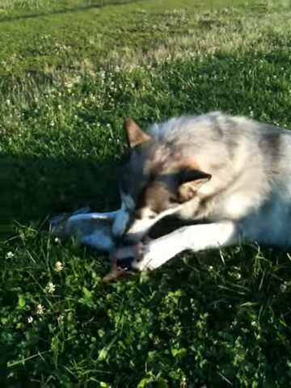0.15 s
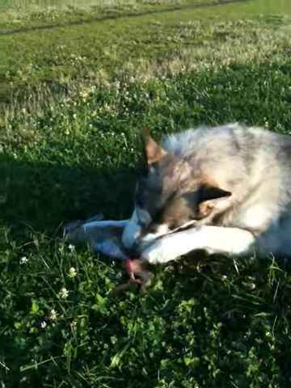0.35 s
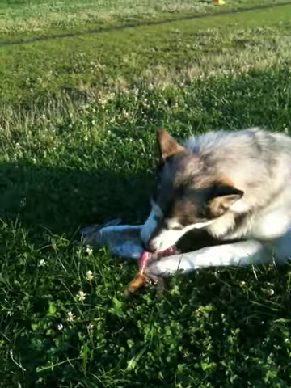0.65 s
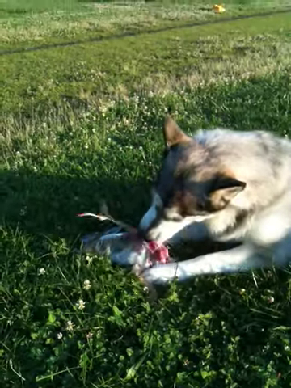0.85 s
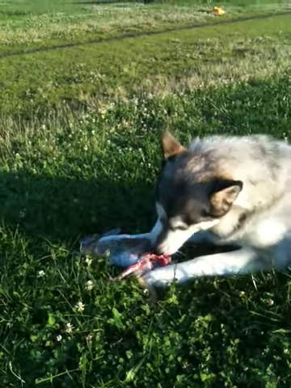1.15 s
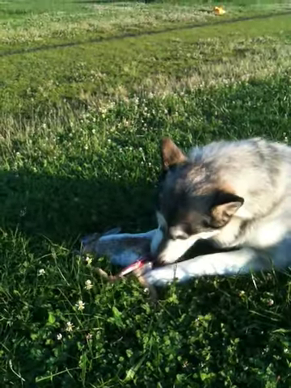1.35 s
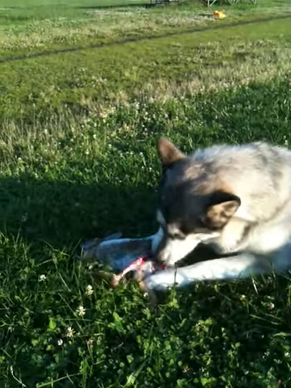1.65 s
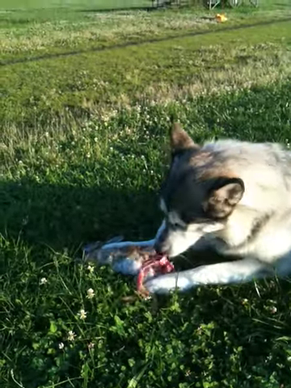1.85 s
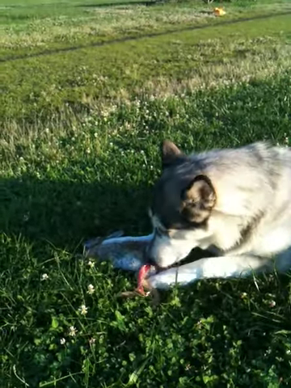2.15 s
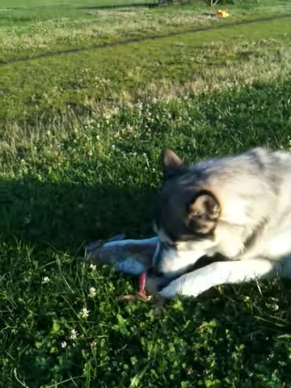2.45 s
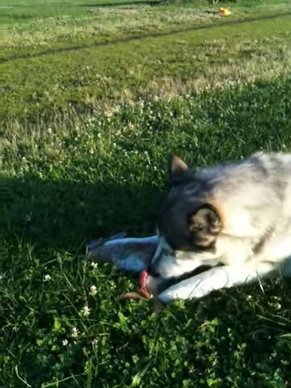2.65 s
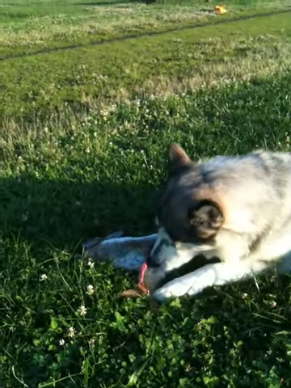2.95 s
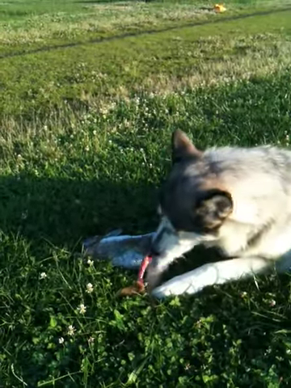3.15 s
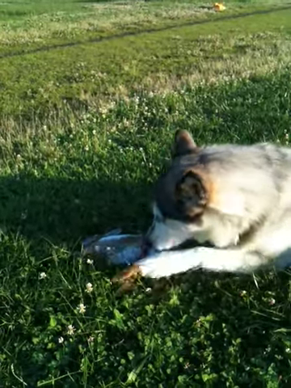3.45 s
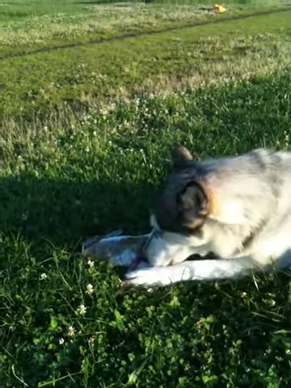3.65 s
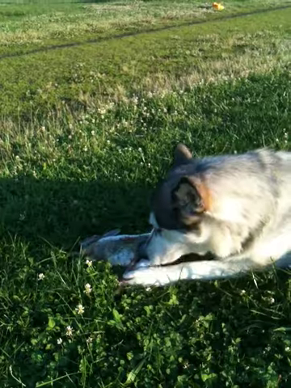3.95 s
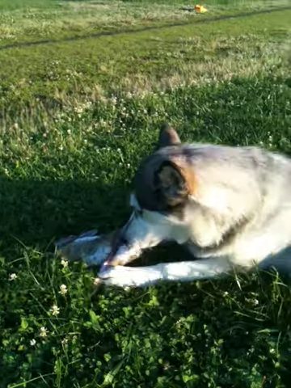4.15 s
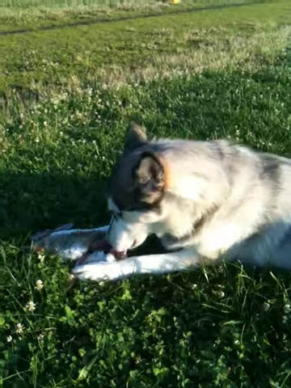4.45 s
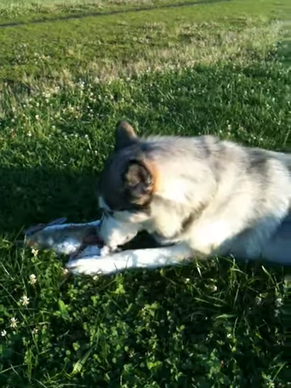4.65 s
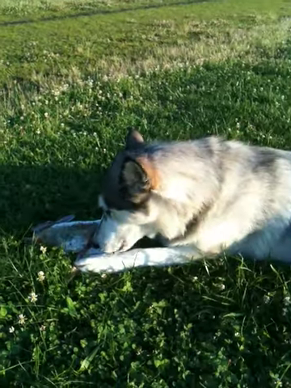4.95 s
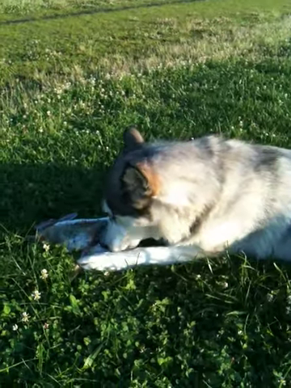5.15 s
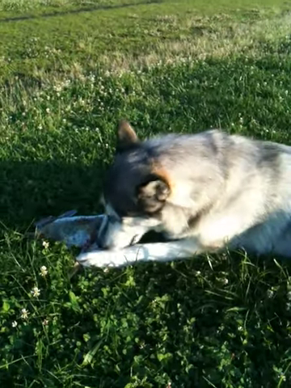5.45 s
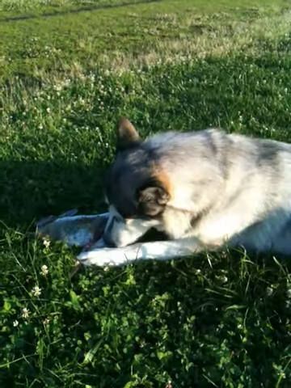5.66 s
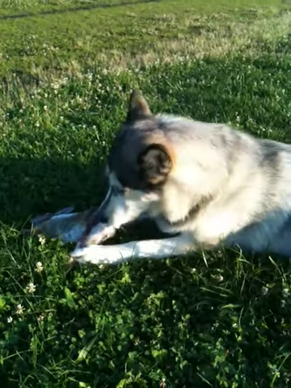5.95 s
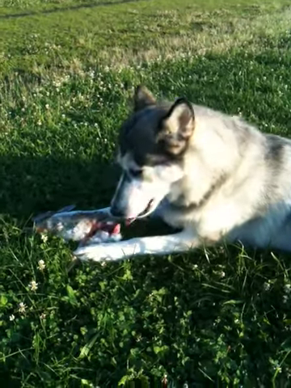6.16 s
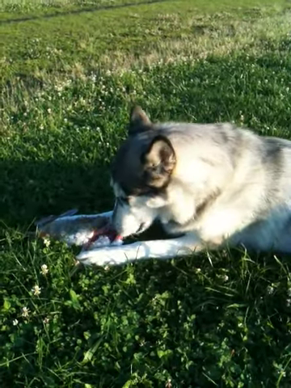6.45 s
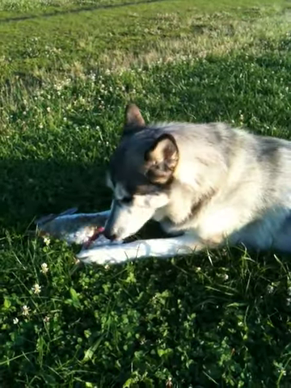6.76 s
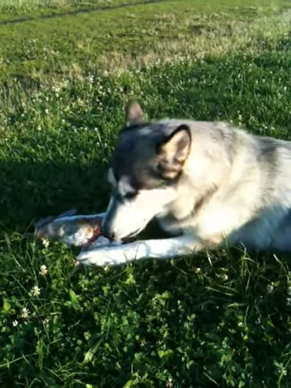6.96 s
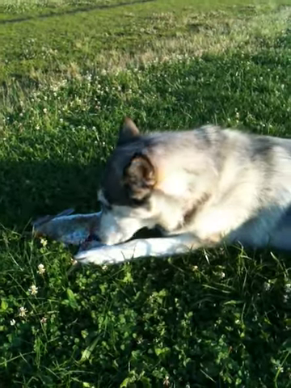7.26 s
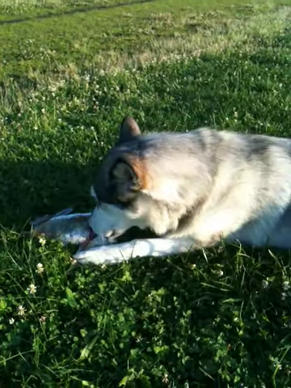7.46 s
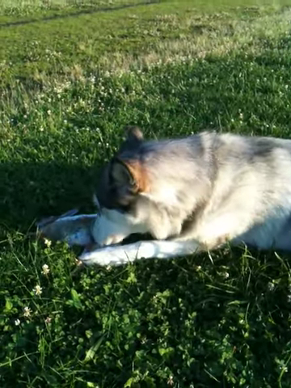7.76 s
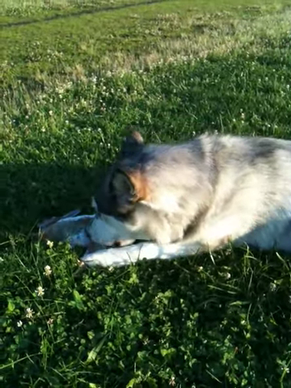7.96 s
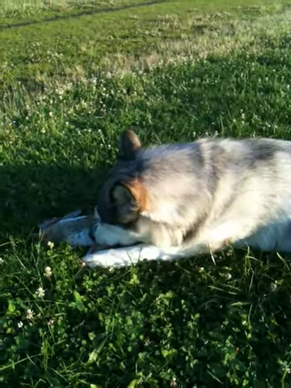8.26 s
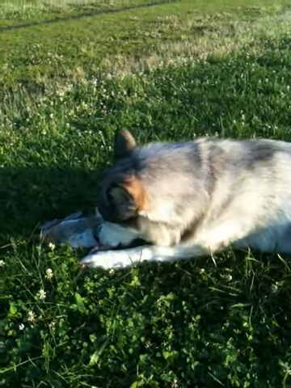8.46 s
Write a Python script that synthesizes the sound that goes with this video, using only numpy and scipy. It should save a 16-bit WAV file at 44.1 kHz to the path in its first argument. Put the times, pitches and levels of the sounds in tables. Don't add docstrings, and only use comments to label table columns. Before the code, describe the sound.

A dog close by gnaws and cracks bones with dry sharp snaps and tiny clicks, over a distant engine drone and faint birds.

```python
import sys
import numpy as np
from scipy import signal
from scipy.fft import rfft, irfft, next_fast_len
from scipy.io import wavfile
from scipy.ndimage import uniform_filter1d

SR = 44100
rng = np.random.default_rng(int(sys.argv[2]) if len(sys.argv) > 2 else 0)


def wrap_up_sound(samples):
    columns = np.atleast_2d(samples).T
    tamed = np.clip(columns, -1, 1)
    steps = np.round(tamed * 32767).astype(np.int16)
    wavfile.write(sys.argv[1], SR, steps)


def attenuation_scalar(level_db):
    decades = np.asarray(level_db, float) / 20
    return 10 ** decades


N = 379260

# start_s, level_db
AIR_CARRY = [(0.0, -52.5), (1.12, -49.5), (1.58, -50), (1.98, -48), (2.25, -52.5), (2.59, -46.5),
             (3.5, -51.5), (4.43, -47), (5.22, -46), (6.15, -42), (6.6, -44.5), (7.5, -47.5), (7.95, -44.5),
             (8.6, -46)]
# start_s, level_db
DEEP_RUMBLE = [(0, 0.5), (1.2, -1), (2.3, 1.5), (3.1, 1.5), (4.2, 3), (4.8, -2.5), (6, 3.5), (7, -5.5),
               (8.6, -3)]


def in_time(rows):
    s, *columns = np.transpose(rows)
    return [np.interp(np.arange(N) / SR, s, c) for c in columns]


def rms_one(x):
    return x / np.sqrt(np.mean(x ** 2) + 1e-20)


def drift(rate_hz):
    pole = np.exp(-80 * np.pi * rate_hz / SR)
    noise = rng.standard_normal(N // 40 + 2002)
    slow = signal.lfilter([1], [1, -2 * pole, pole * pole], noise)[2000:]
    return np.interp(np.arange(N) / 40, np.arange(len(slow)), rms_one(slow))


def coloured(x, spectrum):
    size = next_fast_len(len(x))
    hz = np.maximum(np.arange(size // 2 + 1) * SR / size, 1)
    point_hz, point_db = np.array(spectrum).T
    gain = attenuation_scalar(np.interp(np.log(hz), np.log(point_hz), point_db))
    return rms_one(irfft(rfft(x, size) * gain, size)[:len(x)])


def add(out, s, piece):
    i = int(round(s * SR))
    out[i:i + len(piece)] += piece[:N - i]


def snaps():
    # start_s, peak_db, push_ms, flip_ms
    snap_events = [
        (2.6264, -15, 0.35, 0.13),
        (2.6855, -29.5, 0.22, 0.13),
        (4.2137, -22, 0.3, 0.13),
        (4.244, -22, 0.16, 0.043),
        (4.2505, -32, 0.27, 0.11),
        (4.268, -33, .4, 0.18),
        (4.2637, -26, 0.52, 0.033),
        (4.3548, -27, 0.17, 0.052),
        (4.4699, -8, 0.38, 0.017),
    ]
    shard_hz, shard_decay_s = 6100, 0.00013
    lead = 176
    out, t = np.zeros(N), np.arange(-lead, 530) / SR
    for s, db, push_ms, flip_ms in snap_events:
        broken = .5 + .5 * np.tanh(t / (0.0025 * flip_ms))
        bend = np.exp(-np.abs(np.minimum(t, 0) / (.9e-3 * push_ms)) ** 1.6)
        after = np.maximum(t, 0) / (0.00099 * push_ms)
        release = -np.exp(-(after / 1.67) ** 2.4)
        swing = 0.2 * after / 7.5 * np.exp(-after / 7.2) * np.cos(after / 7.1)
        shard = -.003 / flip_ms * np.sin(2 * np.pi * shard_hz * t) * np.exp(-np.abs(t) / shard_decay_s)
        pressure = 1.21 * bend * (1 - broken) + release * broken + swing + shard
        add(out, s - lead / SR, attenuation_scalar(db) * pressure)
    return signal.sosfilt(signal.butter(2, 100, "high", fs=SR, output="sos"), out)


def knocks():
    # start_s, peak_db, pitch_hz, decay_ms
    knock_events = [(4.2096, -25, 225, 4.5), (4.2142, -32, 800, 1.5), (4.2385, -38, 1100, 2),
                    (4.2275, -39, 1200, 2), (4.2555, -39, 700, 2), (4.2329, -33, 1100, .9),
                    (4.2361, -29, 800, .8), (4.2451, -32, 900, 1.5), (4.2318, -38, 1200, 2),
                    (2.627, -36, 230, 4), (4.2222, -38, 950, 2), (2.6852, -36, 900, 1.2)]
    out, t = np.zeros(N), np.arange(1320) / SR
    for s, db, hz, decay_ms in knock_events:
        add(out, s, attenuation_scalar(db) * np.sin(2 * np.pi * hz * t) * np.exp(-1000 * t / decay_ms))
    return signal.sosfilt(signal.butter(1, 90, "high", fs=SR, output="sos"), out)


def breaks():
    # start_s, level_db, centre_hz
    chip_events = [(.4038, -59, 5010), (0.41, -58, 4440), (.466, -53, 3780), (.776, -53, 3710),
                   (.9124, -47, 3180), (1.0206, -60, 5080), (1.45, -47.5, 2914), (1.5037, -52, 3930),
                   (2.6725, -56, 4100), (.116, -57, 5000), (8.232, -60, 4800), (2.6887, -55, 4580),
                   (2.6943, -51, 4250), (2.7015, -53, 5000), (2.9101, -55, 5500), (2.923, -50, 5600),
                   (3.0299, -53, 3970), (3.1505, -55, 4780), (3.1683, -61, 4210), (3.3433, -51, 4500),
                   (3.482, -57, 4700), (3.532, -61, 4600), (3.558, -59, 4700), (6.052, -58, 4800),
                   (6.18, -60, 4900), (6.195, -60, 4800), (4.3068, -54, 5900), (4.3315, -56, 5300),
                   (4.3781, -57, 6800), (4.408, -57, 5800), (4.4419, -57, 5200), (1.411, -58, 5000),
                   (1.556, -56, 3600), (1.62, -57, 3700), (1.64, -54, 3200), (1.917, -58, 5000),
                   (1.954, -60, 4700), (2.669, -55, 3300), (5.8174, -51, 4500), (5.8598, -56, 5110),
                   (6.0103, -58, 6030), (6.188, -52, 3100), (6.9886, -58, 2730), (7.9079, -48, 3100),
                   (8.0591, -53, 4880), (8.135, -44.5, 3410), (8.3398, -55, 4440), (8.4711, -54, 4600)]
    # start_s, level_db, centre_hz, spread_octaves
    crack_events = [(4.2092, -43, 4800, .3), (4.7775, -51, 4200, .35), (4.2126, -37, 2600, .35),
                    (4.2135, -30, 4000, .27), (4.2395, -29, 3500, .38), (4.244, -35, 4200, .55),
                    (4.2455, -42, 3600, .5), (4.2475, -44, 4500, .25), (4.2508, -47, 3800, .35),
                    (4.2362, -45, 2600, .35), (4.2638, -35, 3500, .4), (4.355, -41, 3100, .35),
                    (2.6856, -44, 2800, .45), (1.7799, -40, 3000, .3), (1.7804, -46, 6300, .15),
                    (1.7815, -41, 3800, .45)]
    # start_s, level_db
    fragment_events = [(2.5992, -68), (2.6145, -55), (2.6228, -47), (2.6262, -31), (4.2293, -35),
                       (4.2332, -43), (4.2312, -54), (4.2379, -52), (4.2418, -48), (4.2155, -54),
                       (4.253, -54), (4.2025, -62), (4.2548, -53), (4.2575, -56), (4.2605, -52),
                       (4.2755, -56), (4.289, -60), (4.298, -57), (4.2683, -43), (4.2785, -51),
                       (4.283, -53), (4.47, -47)]
    # start_s, level_db
    tick_events = [(.9385, -53.5), (2.2228, -54), (2.4461, -54), (3.4953, -53), (3.5759, -56),
                   (4.2638, -51), (4.2726, -61), (4.2418, -63), (4.2332, -59), (4.318, -58), (4.338, -57),
                   (4.4144, -48), (4.778, -52), (4.8362, -59), (4.843, -55), (5.44, -64), (5.9164, -52),
                   (6.055, -66), (6.066, -65), (7.3432, -55), (7.5179, -53), (7.619, -68), (8.0445, -55),
                   (2.6856, -62), (4.355, -52), (2.648, -62)]
    rows = [(s, db, hz, 0.18) for s, db, hz in chip_events] + list(crack_events)
    for s, db in fragment_events:
        larger_db = db + 45
        rows.append((s, db, 3500 * 2 ** (-.011 * larger_db), 0.37 - .008 * larger_db))
    rows += [(s, db, 7400, .56) for s, db in tick_events]
    return sorted(rows)


def splinters():
    out, t, rows = np.zeros(N), np.arange(220) / SR, breaks()
    fracture = rng.standard_normal((len(rows), 220)) * np.exp(-t / 0.0003)
    fracture[:, 0] = 6.5
    for (s, db, hz, octaves), burst in zip(rows, fracture):
        band_hz = np.clip(hz * 2 ** (1.39 * octaves * np.array([-1, 1])), 300, .45 * SR)
        chip = signal.sosfilt(signal.butter(2, band_hz, "band", fs=SR, output="sos"), burst)
        chip += 0.0059 * np.diff(burst, prepend=0)
        add(out, s - .0003, attenuation_scalar(db + 11.5) * chip / np.sqrt(np.sum(chip ** 2)))
    return out


def gnawing():
    # start_s, length_s, grit_db
    bout_events = [(.38, 0.046, -69), (.76, 0.074, -69), (.98, 0.15, -79), (1.778, 0.0055, -55),
                   (1.766, 0.027, -60), (1.9, 0.068, -72), (2.581, 0.052, -63.5), (2.6205, 0.006, -64),
                   (2.666, 0.098, -71), (2.89, 0.047, -69), (3.24, .1, -82), (3.46, 0.14, -96),
                   (3.95, 0.22, -79), (4.204, 0.012, -62), (4.23, 0.042, -54), (4.27, .06, -70),
                   (4.3, 0.2, -71), (4.53, 0.081, -74), (4.762, 0.033, -68), (5.99, 0.18, -82)]
    # freq_hz, density_db [dB per Hz]
    grit_spectrum = [(400, -10), (1200, -12), (2200, -1), (3200, 10.5), (4500, 4.5), (6500, -4.5),
                     (9000, -11), (15000, -28)]
    effort = np.full(N, attenuation_scalar(-75.5))
    for s, length_s, db in bout_events:
        add(effort, s, attenuation_scalar(db) * np.sin(np.linspace(0, np.pi, int(length_s * SR))) ** 0.58)
    sizes = attenuation_scalar(5.6 * np.minimum(rng.exponential(1, N), 3)) * rng.choice([-1, 1], N)
    cracks_per_s = 4500.0 * attenuation_scalar(4.0 * drift(60))
    born = rng.random(N) < cracks_per_s / SR
    return effort * coloured(sizes * born, grit_spectrum)


def calls():
    # start_s, length_s, middle_hz, level_db
    tweet_events = [(.212, .02, 3560, -67), (.198, .016, 3800, -71), (.588, .018, 3950, -73),
                    (.604, .012, 3350, -64), (.611, .017, 3880, -62), (1.303, .016, 4050, -72),
                    (1.32, .024, 3800, -65), (2.34, .024, 3850, -67), (2.496, .035, 3300, -60.5),
                    (2.89, .016, 3800, -70), (2.915, .018, 3720, -67), (5.515, .02, 3780, -74),
                    (5.525, .015, 3080, -65), (5.19, .02, 2880, -65), (5.135, .015, 3080, -68),
                    (8.53, .015, 3850, -74), (8.58, .02, 3050, -70), (6.09, .024, 4250, -72),
                    (6.095, .014, 5250, -76), (6.635, .019, 4120, -66), (7.67, .015, 3650, -66),
                    (7.658, .016, 4500, -74), (7.366, .018, 3680, -67), (7.933, .024, 3880, -65),
                    (4.083, .033, 3930, -69), (8.03, .015, 2800, -69)]
    # start_s, middle_hz, level_db
    whip_events = [(.212, 4850, -75), (.6, 5100, -70), (1.313, 4800, -71), (2.9, 4500, -73),
                   (3.29, 3500, -72), (4.068, 4600, -73), (4.07, 3200, -70), (4.89, 4900, -75),
                   (8.012, 5200, -75), (8.515, 4950, -78)]
    # start_s, length_s, middle_hz, level_db
    pip_events = [(5.53, .015, 4200, -75), (3.96, .04, 3100, -69), (7.765, .05, 4150, -78),
                  (5.13, .06, 4000, -75), (5.19, .015, 3800, -69), (5.565, .02, 3600, -72),
                  (5.62, .04, 3180, -71), (1.73, .021, 4000, -75), (1.808, .017, 4140, -70),
                  (1.865, .015, 4750, -72), (1.865, .015, 4450, -73), (1.879, .035, 4170, -66),
                  (1.932, .04, 4170, -71), (1.745, .025, 2800, -69), (1.58, .03, 3050, -71),
                  (2.33, .05, 433, -58), (5.468, .05, 2900, -63), (4.015, .022, 3830, -71),
                  (4.663, .067, 3418, -73), (5.039, .015, 5100, -76), (5.18, .016, 3600, -69),
                  (5.219, .085, 3980, -75), (5.23, .03, 2935, -64), (5.272, .03, 3030, -66),
                  (5.6, .02, 2900, -66), (5.734, .025, 2960, -65), (5.99, .05, 3600, -75),
                  (6.077, .03, 3640, -66), (6.105, .04, 3620, -73), (5.35, .035, 2920, -65),
                  (5.385, .05, 2900, -71), (8.352, .06, 3840, -76), (8.415, .05, 3890, -76),
                  (8.468, .04, 3840, -75)]
    # start_s, length_s, middle_hz, level_db
    fall_events = [(1.3, .03, 3600, -70), (1.413, .024, 3350, -69), (1.992, .026, 3370, -61),
                   (2.137, .022, 3200, -64), (5.51, .025, 2780, -67), (1.91, .025, 3500, -75),
                   (5.11, .04, 4250, -73), (5.15, .045, 3800, -72), (1.715, .03, 3000, -71),
                   (5.295, .05, 3000, -64), (5.3, .04, 2580, -68), (5.36, .03, 2750, -68),
                   (2.02, .03, 3080, -67), (1.825, .02, 3800, -76), (1.968, .015, 3800, -75),
                   (8.51, .02, 3200, -70), (8.5, .035, 3800, -72), (8.535, .065, 3620, -70),
                   (2.165, .025, 2700, -70)]
    # start_s, middle_hz, level_db
    dive_events = [
        (.995, 6500, -77),
        (1.075, 4550, -73),
        (1.04, 7000, -80),
        (2.162, 7050, -76),
        (2.388, 3450, -67),
    ]
    # start_s, length_s, middle_hz, level_db
    arch_events = [(1.28, .03, 3700, -65), (1.465, .065, 3490, -66), (1.66, .05, 3270, -67),
                   (2.295, .04, 2627, -66), (.783, .028, 4040, -67), (.226, .03, 4100, -65),
                   (4.907, .02, 4030, -63.5), (8.017, .028, 4000, -67), (5.93, .045, 3600, -68)]
    whip_s = 0.025
    whips = [(s, whip_s, hz, db) for s, hz, db in whip_events]
    dives = [(s, whip_s, hz, db) for s, hz, db in dive_events]
    kinds = [(tweet_events, (-.09, .065)), (whips, (-.15, .11)), (pip_events, (-.012, -.004)),
             (fall_events, (.025, -.049)), (dives, (0.104, -.1)), (arch_events, (-0.073, -.004))]
    return [(s, length_s, hz * (1 + start), hz, hz * (1 + end), db)
            for rows, (start, end) in kinds for s, length_s, hz, db in rows]


def birds():
    # start_s, length_s, low_hz, high_hz, level_db
    buzz_events = [
        (6.67, .22, 4500, 7000, -72),
        (6.7, .3, 4600, 5500, -73),
        (6.95, .53, 4300, 5600, -75),
        (5.08, .3, 2400, 4300, -70),
        (6.65, 1, 2300, 3500, -71),
        (6.7, .17, 2550, 3200, -66),
        (6.8, .22, 2400, 3000, -67),
        (4.418, .022, 5400, 6500, -70),
    ]
    out, waver = np.zeros(N), 1 + .006 * drift(65)
    for s, length_s, start_hz, mid_hz, end_hz, db in calls():
        u = np.linspace(0, 1, int(length_s * SR))
        hz = np.interp(u, [.03, .5, .97], [start_hz, mid_hz, end_hz])
        hz = hz * np.roll(waver, -int(s * SR))[:len(u)]
        add(out, s, attenuation_scalar(db + 3.5) * np.sin(np.pi * u) ** 0.42 * np.sin(2 * np.pi * np.cumsum(hz) / SR))
    out *= attenuation_scalar(1.6 * drift(90))
    for s, length_s, low_hz, high_hz, db in buzz_events:
        u = np.linspace(0, 1, int(length_s * SR))
        band = signal.butter(2, [low_hz, high_hz], "band", fs=SR, output="sos")
        buzz = rms_one(signal.sosfilt(band, rng.standard_normal(len(u))))
        add(out, s, attenuation_scalar(db) * np.sin(np.pi * u ** .75) * buzz)
    return out


def field_echo(x, db, t60_s):
    t = np.arange(int(.25 * SR)) / SR
    tail = rng.standard_normal(len(t)) * (rng.random(len(t)) < .02) * attenuation_scalar(-60 * t / t60_s)
    return x + attenuation_scalar(db) * signal.fftconvolve(x, tail / np.sqrt(np.sum(tail ** 2)))[:N]


def engine():
    # start_s, cycles_per_s
    speed_curve = [(0, 21.5), (2, 21.25), (4.3, 20.9), (6.5, 21.15), (8.6, 21.4)]
    # multiple, level_db
    order_levels = [(1, -48), (2, -31), (3, -34), (4, -46), (5, -10.5), (6, -11), (7, 2), (8, -7),
                    (9, -3.5), (10, -11.5), (11, -9.5), (12, -9.5), (13, -19.5), (14, -26.5), (15, -27),
                    (16, -29.5), (17, -23.5), (18, -22.5), (19, -23), (20, -21.5), (21, -22)]
    upper_lift = 0.029
    pulse_spread_rad = .6
    turn = 2 * np.pi * np.cumsum(in_time(speed_curve)[0]) / SR
    carry_db = in_time(AIR_CARRY)[0]
    swell_db = uniform_filter1d(carry_db - carry_db.mean(), size=SR)
    deep_db = in_time(DEEP_RUMBLE)[0] - swell_db
    orders = np.zeros(N)
    for k, db in order_levels:
        path_db = upper_lift * max(k - 9, 0) * swell_db + (k < 6) * deep_db
        fade_db = 1.16 * drift(0.71) + 1.66 * drift(7.8)
        phase = k * turn + 0.43 * drift(1.32) + pulse_spread_rad * k ** 2
        orders += attenuation_scalar(db + path_db + fade_db) * np.sin(phase)
    return attenuation_scalar(carry_db - 1.0) * rms_one(orders)


def road():
    # freq_hz, density_db [dB per Hz]
    roar_spectrum = [(25, -24), (55, -22), (100, -3.5), (160, 4.5), (230, -0.5), (330, -6), (560, -13.5),
                     (820, -6.5), (1250, -4), (1850, -16), (3000, -21), (4200, -34.5), (6400, -43.5)]
    roar = coloured(rng.standard_normal(N), roar_spectrum)
    low = signal.sosfiltfilt(signal.butter(2, [200, 520], "band", fs=SR, output="sos"), roar)
    rumble = signal.sosfiltfilt(signal.butter(3, 112, fs=SR, output="sos"), roar)
    carry_db = in_time(AIR_CARRY)[0]
    low_change = attenuation_scalar(0.28 * (carry_db - carry_db.mean())) - 1
    rumble_change = attenuation_scalar(in_time(DEEP_RUMBLE)[0]) - 1
    roar = roar + low * low_change + rumble * rumble_change
    return attenuation_scalar(-52 + 3.0 + .5 * drift(3.2)) * roar


def scene():
    dog = snaps() + knocks() + splinters() + gnawing()
    far = field_echo(birds(), db=-8.5, t60_s=0.23) + engine() + road()
    return (dog + far)[None]


def duck_treble(x):
    # start_s, length_s, above_hz, loss_db
    duck_events = [
        (1.785, .006, 5000, -14),
        (2.604, .016, 7000, -12),
        (4.2165, .011, 4500, -7),
        (4.2475, .011, 9500, -14),
        (4.4625, .0045, 5200, -30),
        (4.4752, .0115, 3700, -40),
    ]
    before, after = 1764, 2646
    for s, length_s, above_hz, db in duck_events:
        i = int(s * SR)
        span = slice(i - before, i + after)
        gate = np.zeros(before + after)
        gate[before:before + int(length_s * SR)] = 1 - attenuation_scalar(db)
        treble = signal.sosfiltfilt(signal.butter(8, above_hz, "high", fs=SR, output="sos"), x[:, span])
        loss = uniform_filter1d(gate, size=30) * treble
        x = x - np.pad(loss, ((0, 0), (span.start, N - span.stop)))
    return x


def band_limit(x):
    return signal.sosfilt(signal.butter(12, 15805, fs=SR, output="sos"), x)


def record(dry):
    # freq_hz, density_db [dB per Hz]
    hiss_spectrum = [(2000, 10.5), (6000, 0), (9500, 1.5), (11000, -6), (16000, -7)]
    # pitch_hz, level_db
    whine_tones = [(8460, -102), (9841, -98), (11280, -104), (14910, -104), (14971, -97), (15030, -97)]
    t = np.arange(N) / SR
    hiss = attenuation_scalar(-73.5) * coloured(rng.standard_normal(N), hiss_spectrum)
    whine = sum(np.sqrt(2) * attenuation_scalar(db) * np.sin(2 * np.pi * hz * t) for hz, db in whine_tones)
    x = signal.sosfilt(signal.butter(2, 60, "high", fs=SR, output="sos"), dry + hiss + whine)
    x = signal.sosfilt(signal.cheby2(16, 40, 16050, fs=SR, output="sos"), x)
    return band_limit(duck_treble(x))


dry = scene()
out = record(dry)
wrap_up_sound(out)
```